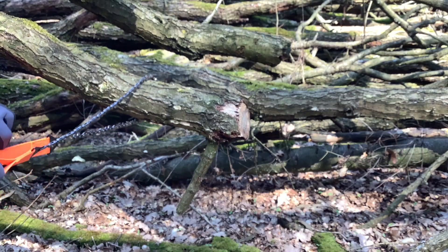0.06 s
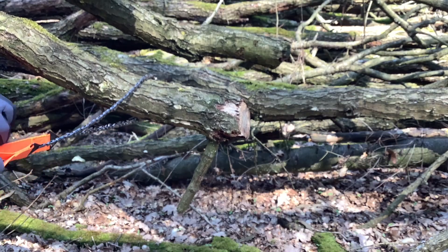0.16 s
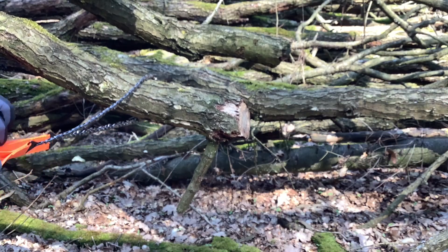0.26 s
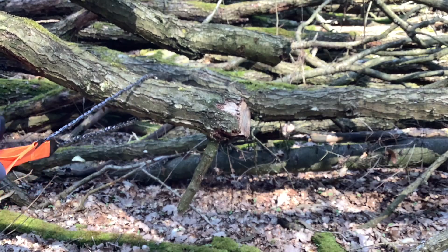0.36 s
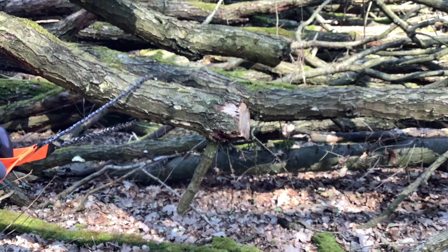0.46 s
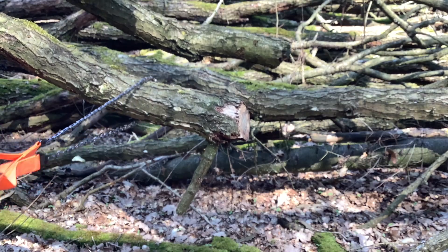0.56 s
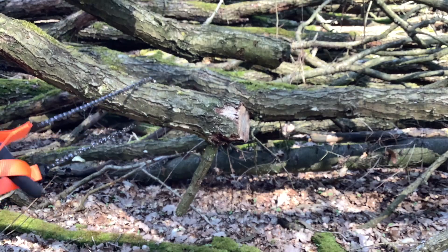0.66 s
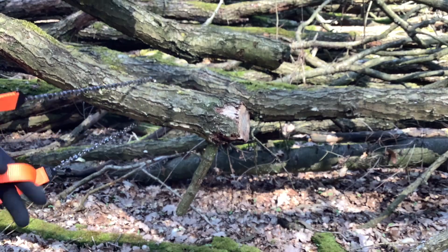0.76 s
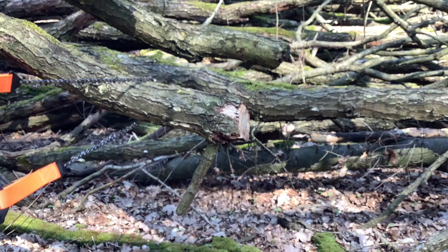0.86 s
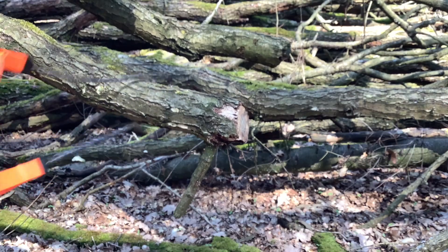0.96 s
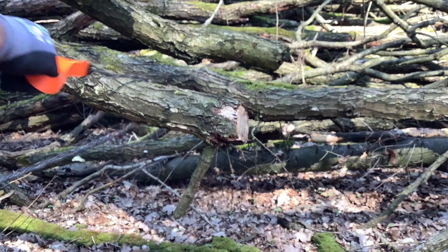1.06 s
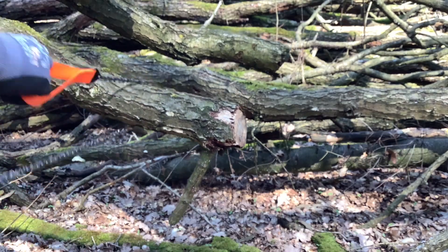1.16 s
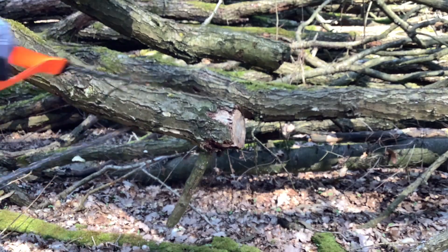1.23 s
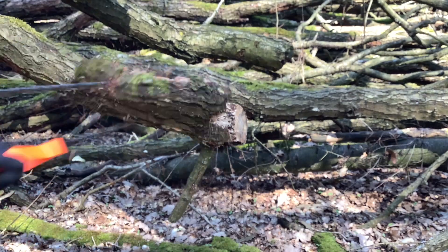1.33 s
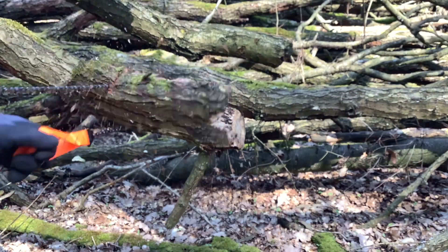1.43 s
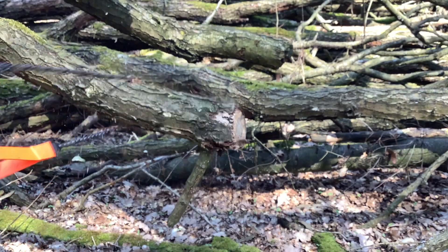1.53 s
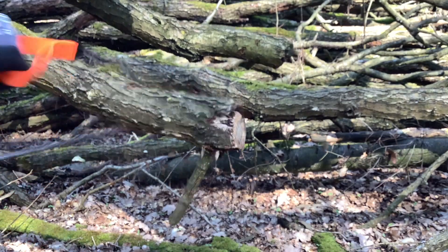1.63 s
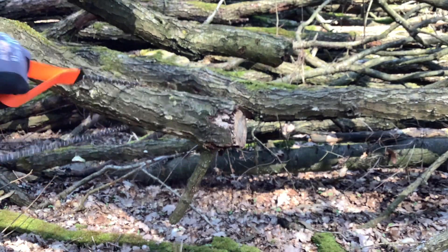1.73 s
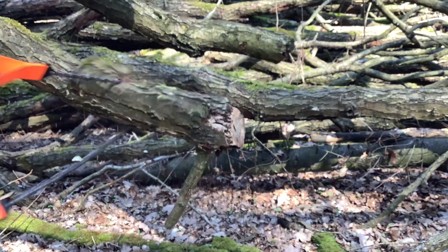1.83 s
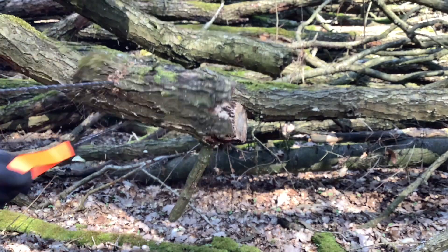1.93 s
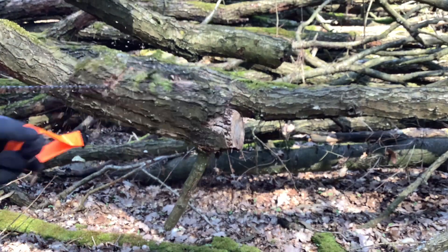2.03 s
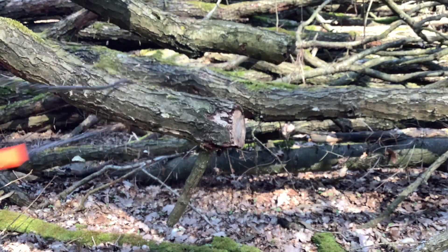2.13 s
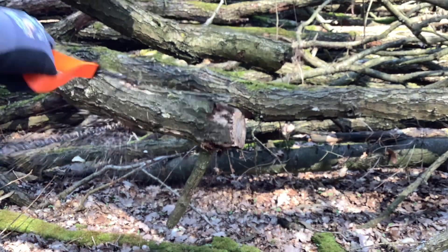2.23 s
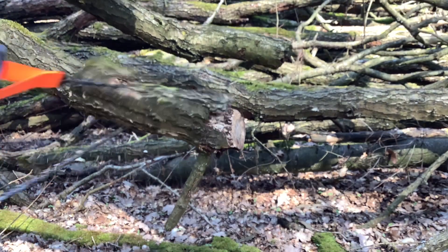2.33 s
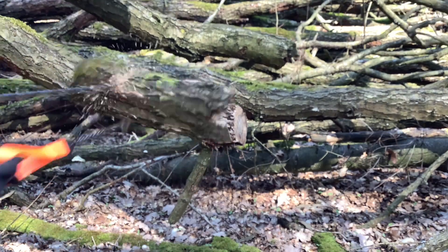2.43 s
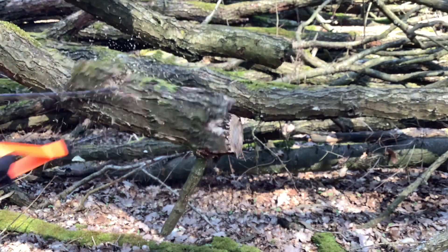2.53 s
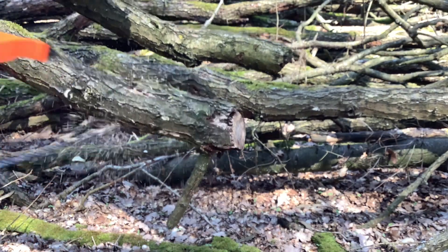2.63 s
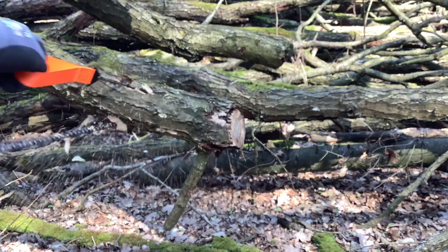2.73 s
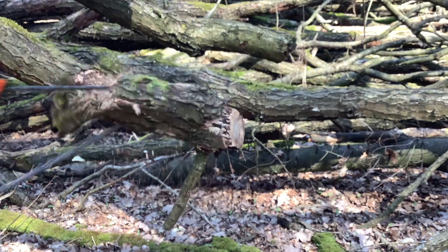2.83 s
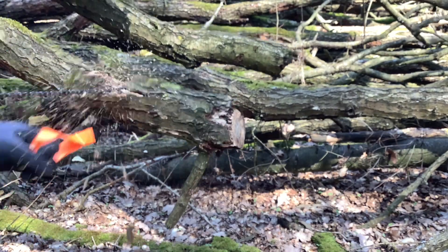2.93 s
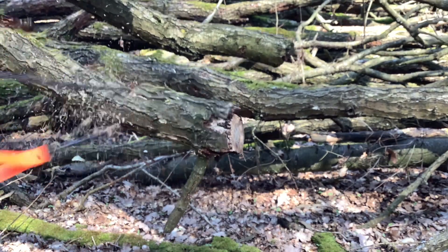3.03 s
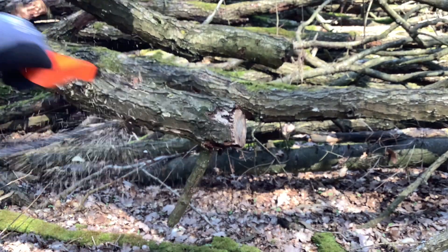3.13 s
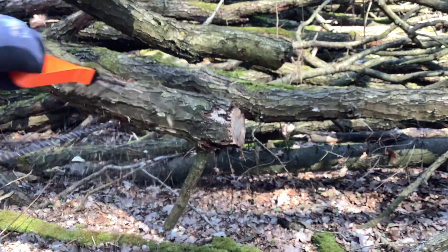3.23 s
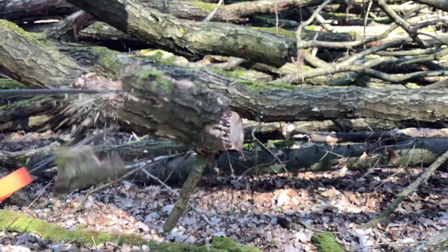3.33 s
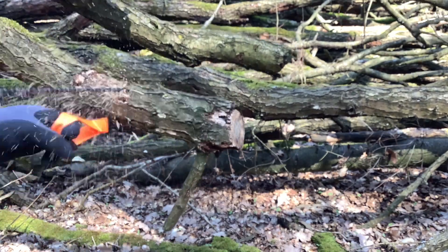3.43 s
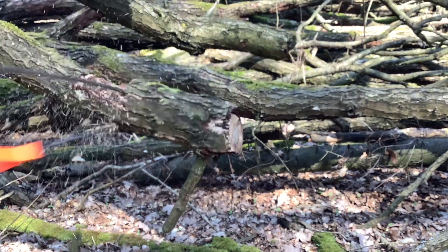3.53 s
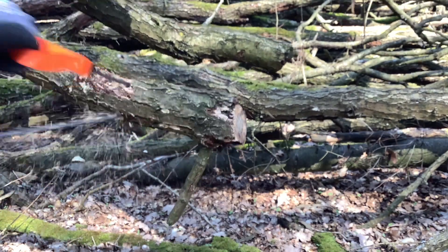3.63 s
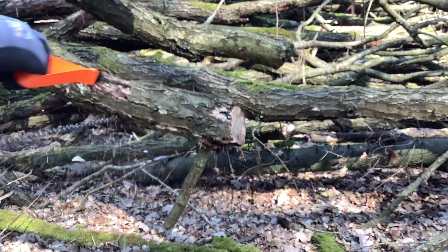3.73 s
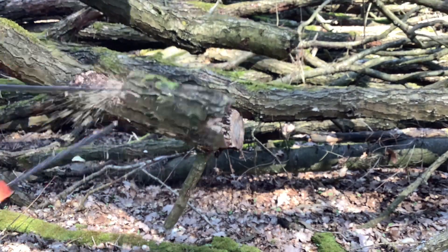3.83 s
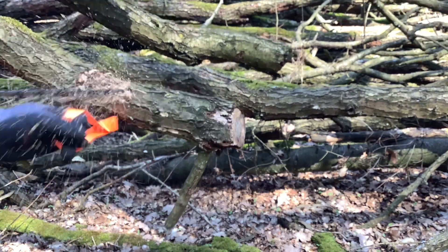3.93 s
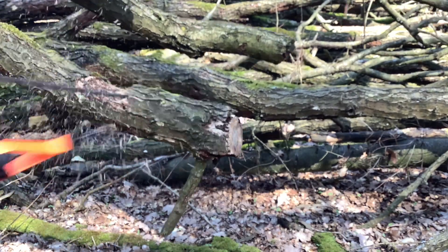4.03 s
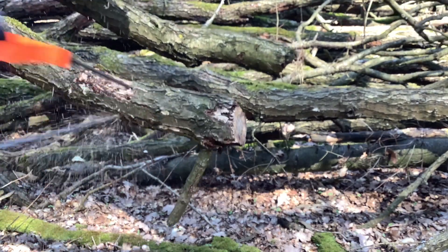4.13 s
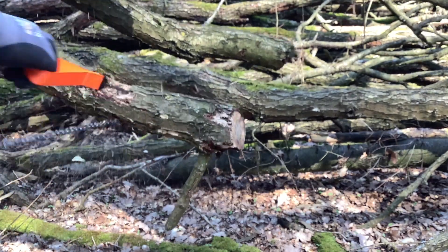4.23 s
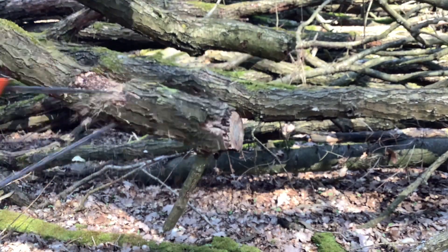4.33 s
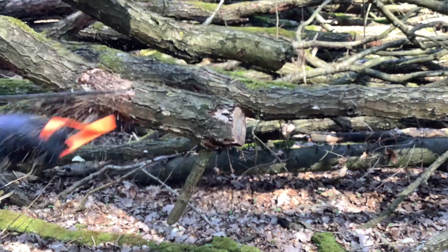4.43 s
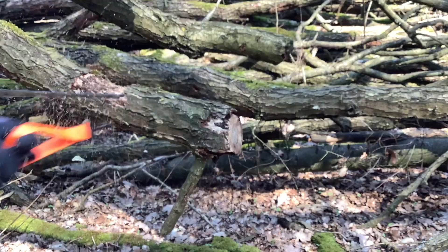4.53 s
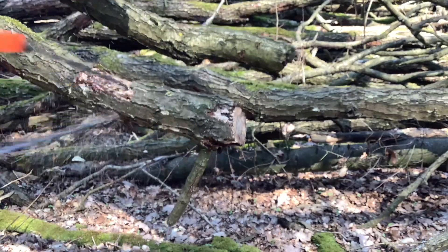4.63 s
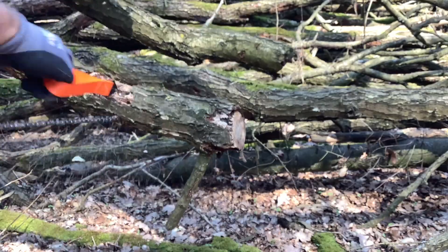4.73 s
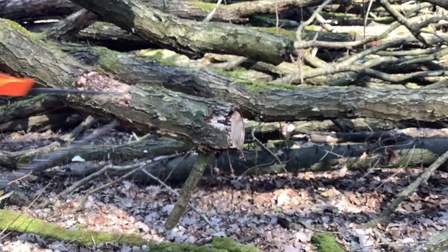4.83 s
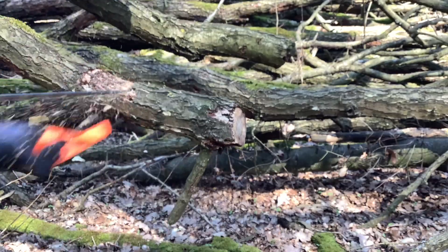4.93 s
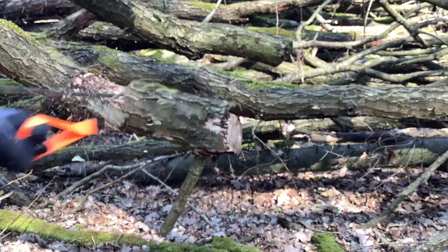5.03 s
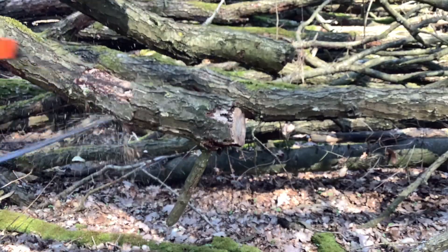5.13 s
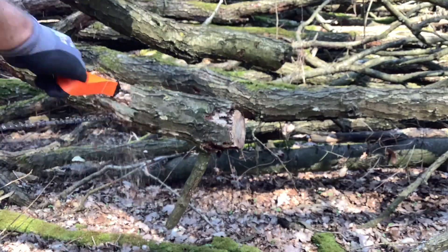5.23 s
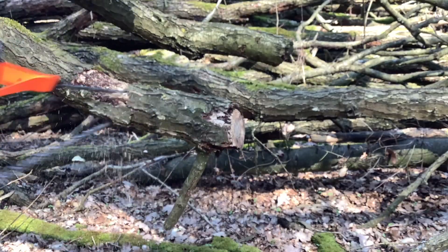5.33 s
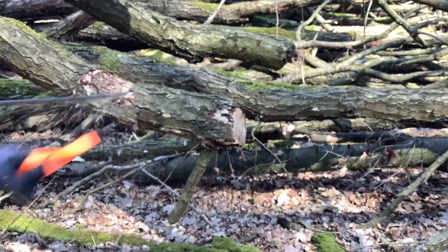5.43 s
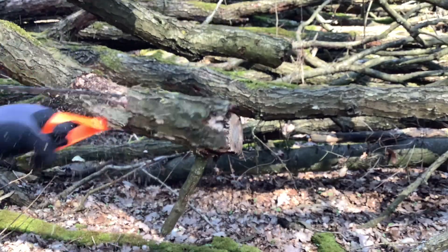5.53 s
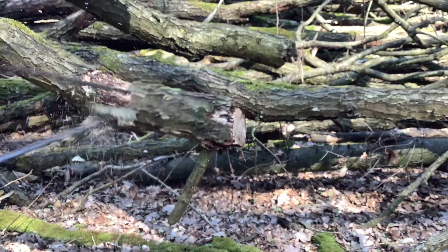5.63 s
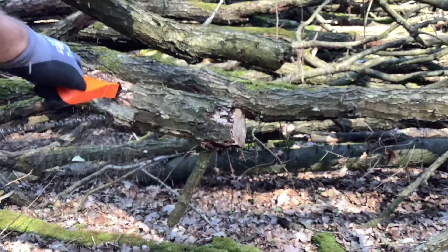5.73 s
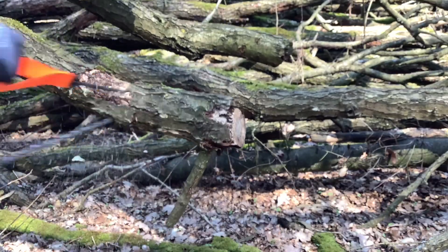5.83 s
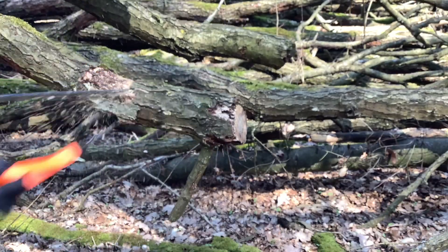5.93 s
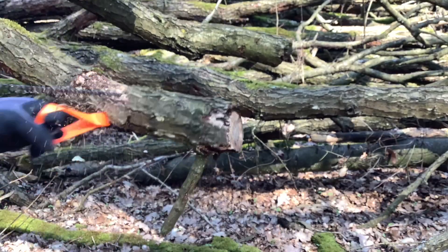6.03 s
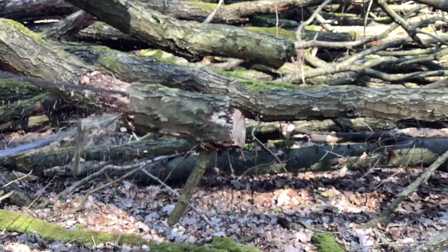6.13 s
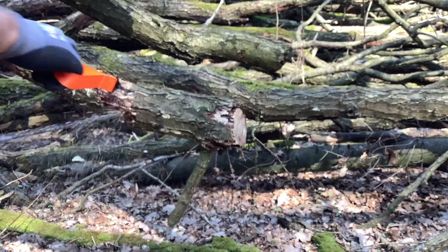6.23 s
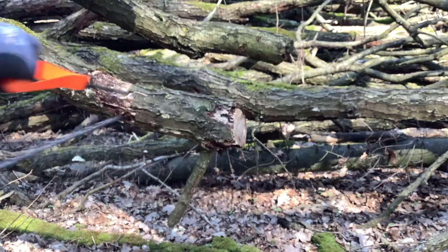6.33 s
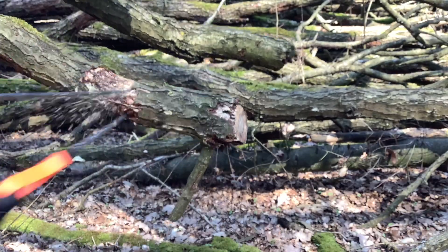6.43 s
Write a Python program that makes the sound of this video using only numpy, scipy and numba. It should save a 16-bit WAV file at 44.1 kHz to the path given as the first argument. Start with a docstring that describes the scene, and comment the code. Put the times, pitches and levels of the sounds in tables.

```python
"""Far traffic and a low engine hum are heard first, with faint tones and a bird; a slack chain rustles as it
is laid on a branch in woodland. Then the hand-pulled chain saw rasps to and fro, a metre or two away.
Its teeth tear fibres and drive the resonant modes of the wood, its links throb over the kerf at a pitch
that follows the pull, and steel and chips hiss. Teeth snag and snap free; now and then a link clinks."""
import sys
import numpy as np
from scipy import signal
from scipy.fft import rfft, irfft
from scipy.io import wavfile
from scipy.ndimage import uniform_filter1d
from numba import njit

SR = 44100
rng = np.random.default_rng(int(sys.argv[2]) if len(sys.argv) > 2 else 0)


def master(y):
    """Save y as 16-bit WAV."""
    cut = np.clip(np.atleast_2d(y).T, -1, 1)
    pcm = np.round(cut * 32767)  # scale
    wavfile.write(sys.argv[1], SR, pcm.astype(np.int16))


N = 285768
TIME = np.arange(N) / SR

# spectrum of far traffic: f/Hz, relative level/dB
TRAFFIC_SPECTRUM = [(25, -40), (45, -26), (62, -1), (92, 0), (125, -12), (190, -25.5), (300, -18.5),
                    (480, -21), (700, -19.5), (1050, -22), (1400, -28), (2300, -32), (2600, -38.5),
                    (6000, -41), (16000, -54)]
# course of the engine hum: t/s, f/Hz, level/dB
ENGINE_HUM = [(0.0, 60.5, -67), (0.92, 59.6, -52.5), (4.39, 56.8, -57), (5.3, 54, -56), (6.48, 55, -53)]
# faint far tones: f/Hz, starting level/dB
FAR_TONES = [(296, -72), (1674, -64), (2310, -76), (3760, -75)]
# bird chirps: t/s, duration/s, first f/Hz, last f/Hz, level/dB
BIRD_CHIRPS = [(0.08, .04, 6900, 6000, -71), (.255, 0.038, 6500, 5100, -68)]
# rustle of the chain being laid on: t/s, level/dB
SLACK_RUSTLE = [(0.25, -81), (0.344, -74), (0.818, -64.5), (0.95, -73)]
# slack links jostling: t/s, bright level/dB, dull level/dB
LINK_JOSTLES = [(.2922, -60, -53), (.3144, -63, -51), (.366, -62, -61), (.4439, -52, -48),
                (.4744, -65, -61), (0.545, -65, -46.5), (.58, -60, -66), (.613, -62, -60), (.625, -50, -63),
                (.6544, -54, -58), (.6694, -64, -56), (.6958, -50, -47.5), (.7093, -46, -57),
                (.7706, -65, -50), (.7894, -66, -49), (.82, -71, -51), (.846, -52, -63), (.861, -60, -70),
                (.8844, -56, -68), (.9033, -64, -53), (0.9284, -59, -43)]
# pulls: start t/s, fastest t/s, stop t/s, hand (0 upper, 1 lower), tearing level/dB, hiss level/dB,
# hiss level at the next turn/dB, top link rate f/Hz, throb level/dB
PULLS = [ (0.941, 1.024, 1.144, 0, -26.5, -39, -65, 229, -67),
         (1.191, 1.288, 1.424, 1, -23.5, -33.5, -43.5, 230, -60),
         (1.477, 1.541, 1.582, 0, -27, -42, -48, 233, -58),
         (1.598, 1.652, 1.691, 0, -20.5, -35.5, -49.5, 228, -63),
         (1.819, 1.885, 2.034, 1, -27.1, -33.5, -42.5, 232.2, -60),
         (2.083, 2.184, 2.271, 0, -21, -35, -48, 229.6, -60),
         (2.3, 2.427, 2.506, 1, -24, -34.5, -49.5, 230.2, -50),
         (2.537, 2.628, 2.737, 0, -21.5, -34.5, -45.5, 230, -48),
         (2.757, 2.869, 2.977, 1, -23.5, -36.5, -46, 233.3, -46),
         (2.996, 3.113, 3.203, 0, -21, -33, -43.5, 304.7, -42.5),
         (3.23, 3.376, 3.458, 1, -22.5, -33, -43.5, 301.8, -46),
         (3.491, 3.592, 3.725, 0, -21, -35.5, -40, 299.3, -41),
         (3.735, 3.895, 3.972, 1, -22.5, -33.5, -46.5, 363.7, -41),
         (3.992, 4.134, 4.222, 0, -18, -34, -45, 362, -36),
         (4.263, 4.39, 4.499, 1, -22, -34, -43, 365, -41.5),
         (4.516, 4.665, 4.747, 0, -19.5, -35, -43.5, 346.2, -33),
         (4.775, 4.912, 5.002, 1, -20, -33.5, -45, 380, -39),
         (5.021, 5.181, 5.25, 0, -19, -34, -48.5, 354.6, -33.5),
         (5.278, 5.422, 5.521, 1, -21, -32, -48, 351, -36),
         (5.541, 5.704, 5.771, 0, -19, -33.5, -47, 406, -35),
         (5.788, 5.943, 6.032, 1, -21.5, -32.5, -48.5, 307.3, -42.5),
         (6.05, 6.181, 6.281, 0, -20.5, -36.5, -50.5, 351.6, -37),
         (6.31, 6.452, 6.56, 1, -21.5, -31.5, -50, 314, -43)]
# upper, then lower hand: side of the bite (0-1), boom of the three lowest modes/dB, its drift/(dB/s),
# lift of the throb at half speed/dB
HAND_BITES = [(.1, 1.7, -1.15, 11), (.9, -1.1, 0.15, 24)]
# exponents of speed, a row per hand: tearing while gaining, while slowing, hiss while gaining, while slowing
SPEED_POWERS = [(.95, 1.16, 0.7, 0.84), (1.1, 1.36, 1.78, 1.15)]
# modes of the branch: f/Hz, bandwidth/Hz, gain from the upper side/dB, gain from the lower side/dB
BRANCH_MODES = [(131, 94, -26, -25), (235, 68.5, -11.5, -3), (412, 22, -8, -4.5), (488.4, 33, -7.5, -2.5),
                (625, 99.5, -2.5, 0.5), (820, 313, -3.5, -1.5), (921.6, 162, 2, 1.5),
                (1020, 160, -0.5, -3.5), (1163, 186, 1, 1.5), (1245, 390, -5, -3.5), (1736, 316, -8.5, -5),
                (2293, 425, -11.5, -8.5), (2693, 930, -14.5, -11), (3276, 1250, -19, -15.5)]
# spectrum of the bright hiss as heard, stepping down above 6 kHz: f/Hz, relative level/dB
HISS_SPECTRUM = [(1200, -2), (2500, 0), (3500, 1.5), (4400, 3.5), (5800, 7), (6400, -1), (9500, 1),
                 (12000, -2), (16000, -2.5)]
# teeth snapping free: t/s, level/dB, ring f/Hz, relative level of the crack/dB
TOOTH_SNAGS = [(0.958, -23, 835, -2), (1.069, -24, 830, -8), (1.224, -21.5, 616, -8),
               (1.281, -13, 1100, -7), (1.494, -24.5, 1520, -11), (1.514, -20, 1290, -12),
               (1.537, -17.5, 1280, -28), (1.608, -26, 1440, -13), (1.643, -9.5, 1290, -27),
               (1.648, -14, 814, -28), (1.655, -10.5, 1000, -25), (1.667, -13.5, 860, -20),
               (1.709, -34.5, 680, 7.5), (1.775, -52, 877, -10), (1.84, -26, 670, -21),
               (2.106, -21, 1352, -27), (2.118, -9.5, 1300, -18), (2.555, -14.5, 1290, -16),
               (2.606, -21, 920, -21), (2.67, -23, 598, -15), (2.678, -24, 1070, 3.5),
               (2.776, -25.5, 792, -2), (3.002, -38, 1100, 1), (3.309, -18, 711, -14),
               (3.511, -21.5, 1100, -11), (3.658, -15.5, 1030, -7), (3.743, -31, 631, -15),
               (3.78, -21, 1284, -29), (4.003, -32, 1070, -16), (4.302, -24, 743, -26),
               (4.534, -31, 597, 2.5), (4.562, -19.5, 1120, -7), (4.808, -28, 882, -5),
               (4.822, -18.5, 610, -30), (5.038, -36, 843, -4), (5.288, -25.5, 1035, -26),
               (5.34, -18, 938, -32), (5.46, -17, 1637, -6.5), (5.559, -25.5, 1106, -4),
               (5.807, -26.5, 1048, -4), (5.873, -28, 645, -23), (5.93, -13.5, 1285, -8),
               (6.077, -22.5, 1138, -5), (6.397, -20, 619, -6)]
# ringing links: t/s, f/Hz, level/dB, time to fall 60 dB/s
LINK_CLINKS = [(1.172, 4550, -54, 0.14), (1.725, 4450, -50, .35), (1.786, 3050, -41, 0.036),
               (1.795, 4450, -49, .15), (2.73, 4500, -55, 0.1), (5.807, 5160, -30, 0.049)]
# sprays of chips: t/s, relative level/dB
CHIP_SPRAYS = [(1.3553, -17), (1.4262, -37), (1.4453, -34), (1.924, -24), (2.019, -29), (2.063, -25),
               (2.0842, -37), (2.1794, -18.5), (2.5744, -18.5), (2.5945, -22), (2.6294, -34),
               (2.7095, -21.5), (3.1674, -22), (3.6644, -19), (3.674, -14), (3.6894, -21), (3.896, -18.5),
               (5.0365, -19)]


def undb(db):
    """Amplitude ratio of a level in decibels."""
    return 10 ** (np.asarray(db) / 20)


def unit(x):
    """Normalisation to an rms of 1."""
    return x / np.sqrt(np.mean(x ** 2))


@njit
def resonator(x, hz, width):
    """Second-order resonance: a state-variable band-pass, gain 1 at a centre that may move."""
    y, band_state, low_state = np.empty(len(x)), 0., 0.
    for i in range(len(x)):
        g, damping = np.tan(np.pi * hz[i] / SR), width / hz[i]
        band = (band_state + g * (x[i] - low_state)) / (1 + g * (g + damping))
        band_state, low_state = 2 * band - band_state, low_state + 2 * g * band
        y[i] = damping * band
    return y


def walk(rate):
    """Smooth random modulation: values held for 1 / rate seconds and averaged twice; rms 1."""
    hold = int(SR / rate)
    steps = np.repeat(rng.standard_normal(N // hold + 1), hold)
    return unit(uniform_filter1d(uniform_filter1d(steps, hold), hold)[:N])


def colour(x, spectrum):
    """Spectral shaping by a curve of (f/Hz, level/dB) points; rms 1."""
    hz, db = np.transpose(spectrum)
    f = np.maximum(np.fft.rfftfreq(N, 1 / SR), 1)
    return unit(irfft(rfft(x) * undb(np.interp(np.log(f), np.log(hz), db, -90, -90)), N))


def noise_band(hz, width):
    """White noise through one resonance; rms 1."""
    return unit(resonator(rng.standard_normal(N), np.full(N, float(hz)), width))


def grains(per_s, spread_db):
    """Shot noise: clicks at random moments, some much larger than the rest."""
    size_db = spread_db * np.minimum(rng.exponential(size=N), 3)
    return (rng.random(N) < per_s / SR) * rng.standard_normal(N) * undb(size_db)


def traffic(level_db=-51):
    """Far traffic is broadband noise, strongest in the bass, that swells slowly."""
    return undb(level_db + walk(0.27)) * colour(rng.standard_normal(N), TRAFFIC_SPECTRUM)


def engine():
    """The periodic motion of an idling engine radiates a low tone, here sinking in pitch."""
    s, hz, db = np.transpose(ENGINE_HUM)
    phase = 2 * np.pi * np.cumsum(np.interp(TIME, s, hz)) / SR
    return np.sqrt(2) * undb(np.interp(TIME, s, db) + 0.5 * walk(7.8)) * np.sin(phase)


def far_tones(fall_db_per_s=15):
    """Narrow bands of noise are heard as wavering tones; they die away exponentially."""
    return sum(undb(db - fall_db_per_s * TIME) * noise_band(hz, width=12.) for hz, db in FAR_TONES)


def bird():
    """Each far chirp is a frequency sweep, gliding down under a half-sine envelope."""
    out = np.zeros(N)
    for s, length, from_hz, to_hz, db in BIRD_CHIRPS:
        share = np.clip((TIME - s) / length, 0, 1)
        phase = 2 * np.pi * np.cumsum(from_hz + (to_hz - from_hz) * share) / SR
        out += undb(db) * np.sin(np.pi * share) * np.sin(phase)
    return out


def burst(start, rise_s, decay_s):
    """Envelope of a transient: a linear rise times an exponential decay."""
    return np.clip((TIME - start) / rise_s, 0, 1) * np.exp(-np.abs(TIME - start) / decay_s)


def slack_chain():
    """Many small steel impacts merge into a grainy rustle, with short bursts when links jostle."""
    bright, dull = np.zeros((2, N))
    for s, bright_db, dull_db in LINK_JOSTLES:
        jostle = burst(s, rise_s=0.0016, decay_s=0.006)
        bright += undb(bright_db) * jostle
        dull += undb(dull_db) * jostle
    bright += undb(np.interp(TIME, *np.transpose(SLACK_RUSTLE), -99, -99) + 3 * walk(40))
    rustle = colour(unit(grains(900., 2.1)) + rng.standard_normal(N), HISS_SPECTRUM)
    return bright * rustle + (dull + 0.14 * bright) * noise_band(1500, width=2100.)


def chain_motion(rest_db=-51.5, slowest_hz=190.1, link_power=0.55, throb_power=3.2):
    """Speed rises and falls in quarter sines; tearing, hiss, link rate and throb follow by power laws."""
    start, fastest, stop, hand, tear_db, hiss_db, turn_db, top_hz, throb_db = np.transpose(PULLS)
    pull = np.maximum(np.searchsorted(start, TIME) - 1, 0)
    rise = (TIME - start[pull]) / (fastest - start)[pull]
    fall = (stop[pull] - TIME) / (stop - fastest)[pull]
    speed = np.sin(np.pi / 2 * np.clip(np.minimum(rise, fall), 0, 1))
    puller, slowing = hand[pull].astype(int), (fall < rise).astype(int)
    side, boom_db, boom_db_per_s, lift_db = np.array(HAND_BITES)[puller].T
    tear_power, hiss_power = np.reshape(SPEED_POWERS, (2, 2, 2))[puller, :, slowing].T
    taut = TIME > start[0]
    tear = taut * np.hypot(undb(tear_db[pull]) * speed ** tear_power, undb(rest_db))
    turn_hiss = undb(np.interp(TIME, stop, turn_db))
    hiss = taut * np.hypot(undb(hiss_db[pull]) * speed ** hiss_power, turn_hiss)
    bite = side, boom_db + boom_db_per_s * TIME
    link_hz = np.maximum(top_hz[pull] * speed ** link_power, slowest_hz)
    throb = undb(throb_db[pull] + 2 * lift_db * (1 - speed)) * speed ** throb_power
    return tear, hiss, bite, link_hz, throb


def branch(force, bite, hollow_db_per_s=0.39):
    """Modal superposition: the wood rings in drifting modes, weighted by the side the chain bites from."""
    side, boom_db = bite
    out = np.zeros(N)
    for k, (hz, width, upper_db, lower_db) in enumerate(BRANCH_MODES):
        db = upper_db + (lower_db - upper_db) * side + boom_db * (k < 3) + 0.85 * walk(10)
        if 850 < hz < 1200:  # these modes grow as the kerf deepens
            db += hollow_db_per_s * (TIME - TIME.mean())
        out += (-1) ** k * undb(db) * resonator(force, hz * (1 + 0.014 * walk(9.9)), float(width))
    return out


def chips(cutters, hiss):
    """A bright hiss is noise modulated by the cutters; each chip is a puff of about a millisecond."""
    sprays = sum(0.5 * undb(db) * burst(s, rise_s=0.0045, decay_s=0.0058) for s, db in CHIP_SPRAYS)
    puffs = signal.lfilter([1], [1, -np.exp(-1 / (0.00024 * SR))], np.abs(grains(250., 2.2)))
    noise = cutters * (1 + 0.5 * unit(puffs)) * rng.standard_normal(N)
    return (hiss + sprays) * colour(noise, HISS_SPECTRUM)


def saw():
    """Forced vibration: fibres tear in bunches as each cutter passes, and every link pushes on the kerf."""
    tear, hiss, bite, link_hz, throb = chain_motion()
    link_phase = 2 * np.pi * np.cumsum(link_hz * (1 + 0.035 * walk(60))) / SR
    cutters = undb(1.16 * np.cos(link_phase / 4) + 0.4 * walk(60) + 1.44 * walk(200))  # one in four links
    tearing = grains(6000., 1.74) + 0.31 * rng.standard_normal(N)
    fibres = cutters * (1 + 0.24 * np.cos(link_phase)) * tearing
    wood = branch(1e-18 + fibres * tear, bite) / np.std(branch(fibres, bite))
    growl = np.sqrt(2) * throb * np.cos(link_phase) * undb(4 * walk(50))
    harmonics = 1.8 * np.cos(2 * link_phase) + 1.27 * np.cos(3 * link_phase)
    overtones = branch(throb * harmonics * undb(4.3 * walk(40)), bite)
    return wood + growl + overtones + chips(cutters, hiss)


def snags(samples=900):
    """Impulsive excitation: a tooth snaps free with a tick, a brief ring of wood and a bright crack."""
    out, t = np.zeros(N + samples), np.arange(samples) / SR
    highpass = signal.butter(2, 3500, "high", fs=SR, output="sos")
    for s, db, hz, crack_db in TOOTH_SNAGS:
        ring = np.sin(2 * np.pi * hz * t) * (t / 0.00089) * np.exp(1 - t / 0.0011)
        tick = 0.93 * np.sin(2 * np.pi * 2.06 * hz * t) * (t / 0.00047) * np.exp(1 - t / 0.00038)
        treble = signal.sosfilt(highpass, rng.standard_normal(samples))
        crack = treble * (t / 0.0013) * np.exp(1 - t / 0.0013)
        out[int(s * SR):][:samples] += undb(db) * (ring + tick + undb(crack_db) * crack)
    return out[:N]


def clinks():
    """Damped free vibration: a steel link rings at one frequency, its level flickering as it decays."""
    out = np.zeros(N)
    for s, hz, db, t60 in LINK_CLINKS:
        age = np.maximum(TIME - s, 0)
        out += undb(db - 60 * age / t60 + 3 * walk(200)) * np.sin(2 * np.pi * hz * age)
    return out


def woodland_echo(near, level_db=-15, delay_s=0.003, decay_s=0.009):
    """Scattering from trunks and leaf litter returns a short, faint tail."""
    t = np.arange(5000) / SR
    tail = rng.standard_normal(len(t)) * np.exp(-t / decay_s) * (t > delay_s)
    return undb(level_db) * signal.fftconvolve(near, tail / np.linalg.norm(tail))[:N]


def scene():
    """Superposition: the near sounds, their echo and the far sounds add in one channel."""
    near = saw() + snags() + clinks() + slack_chain()
    return (near + woodland_echo(near) + engine() + far_tones() + bird() + traffic())[None]


def record(dry, low_hz=45, top_hz=15750):
    """Band limiting: the microphone drops the deepest bass and cuts the top."""
    thin = signal.sosfilt(signal.butter(4, low_hz, "high", fs=SR, output="sos"), dry)
    return signal.sosfilt(signal.ellip(12, 0.2, 70, top_hz, fs=SR, output="sos"), thin)


dry = scene()
out = record(dry)
master(out)
```